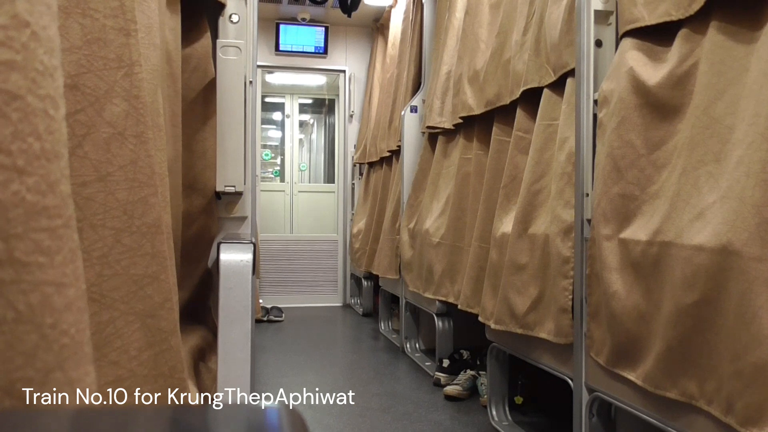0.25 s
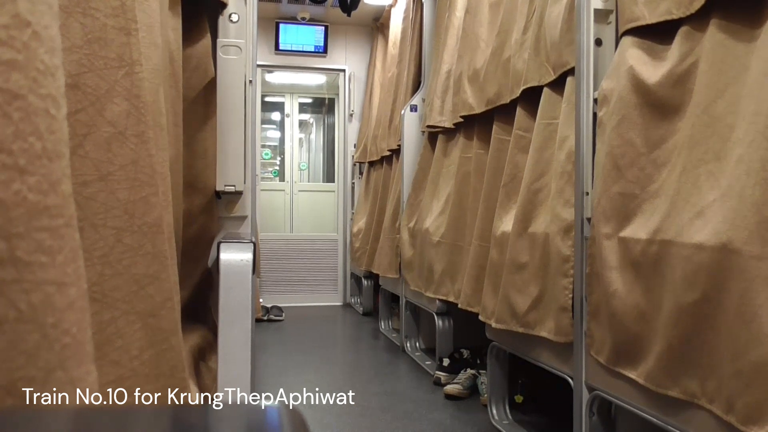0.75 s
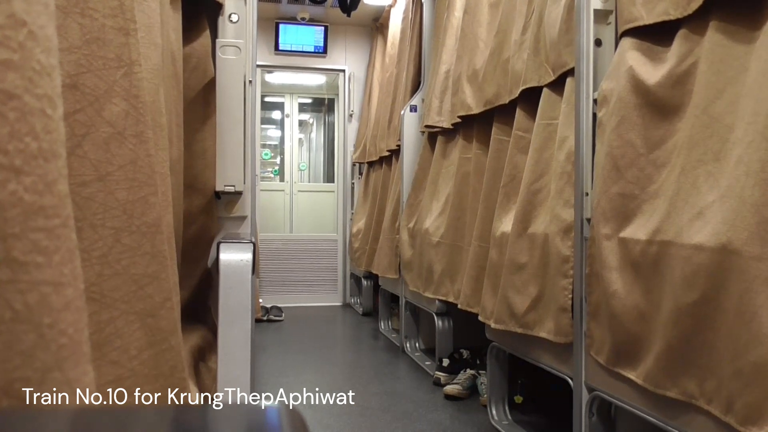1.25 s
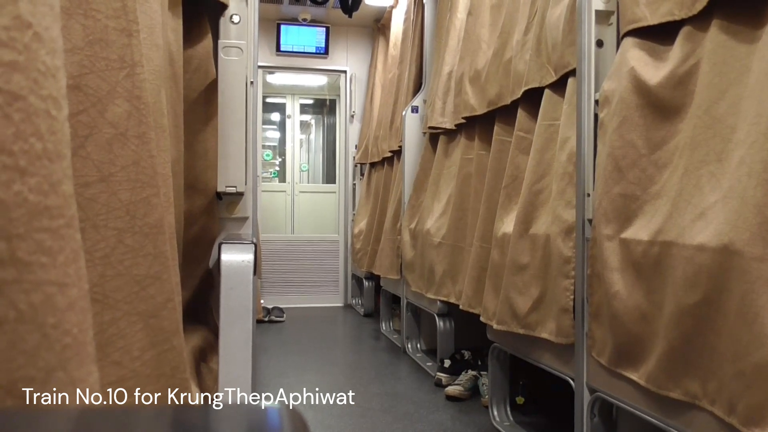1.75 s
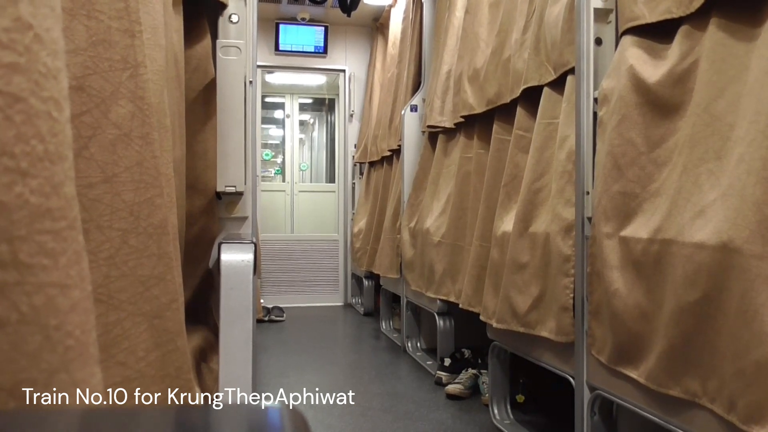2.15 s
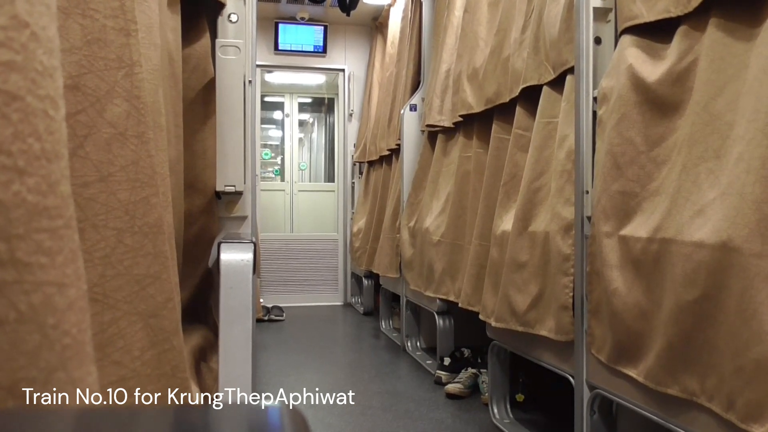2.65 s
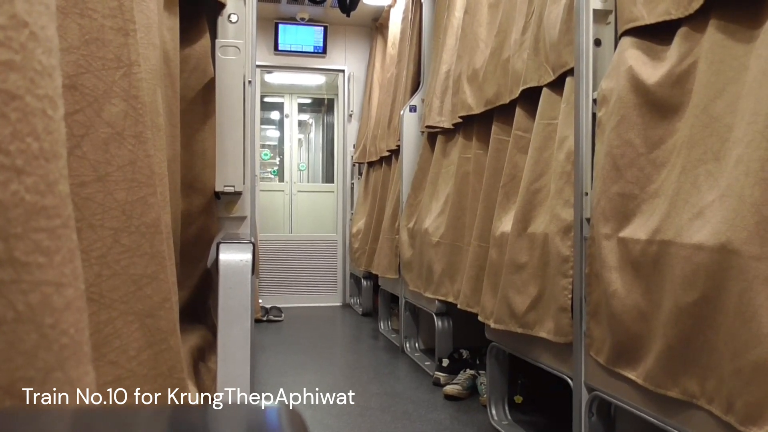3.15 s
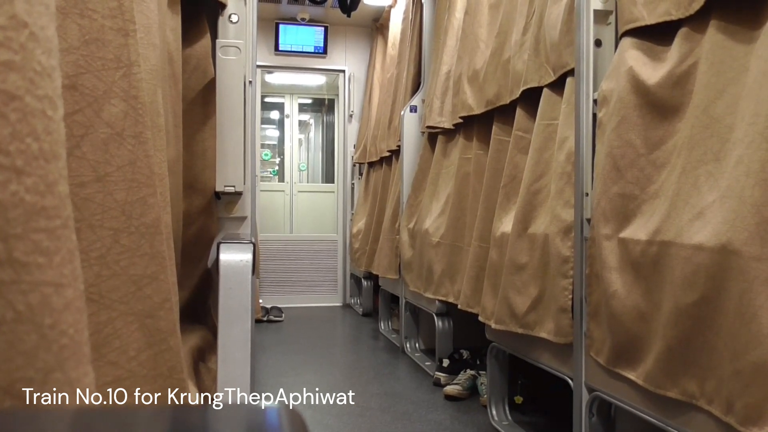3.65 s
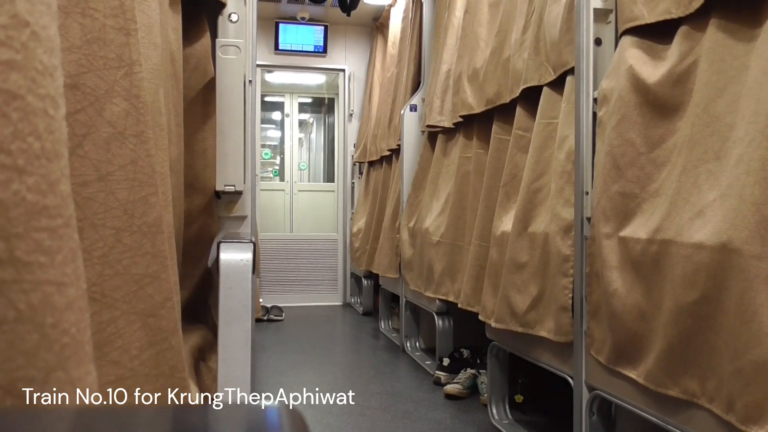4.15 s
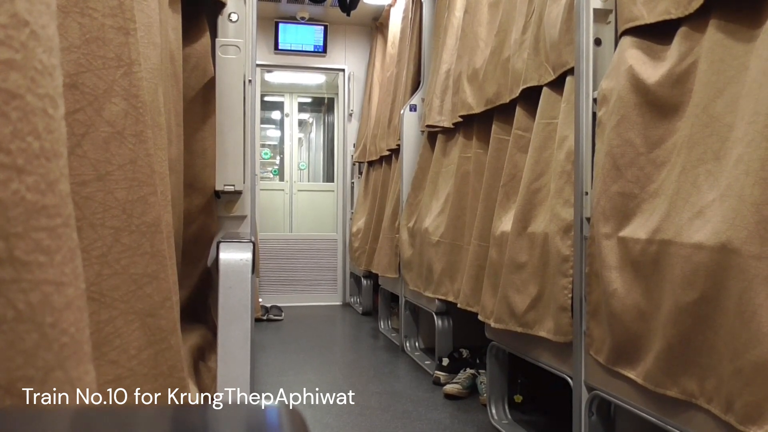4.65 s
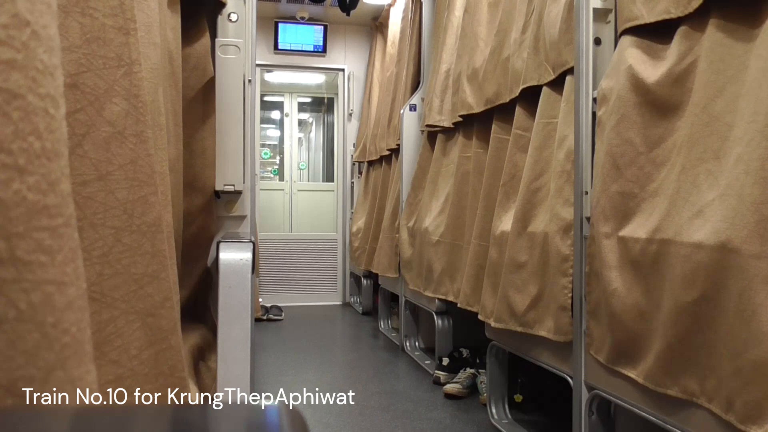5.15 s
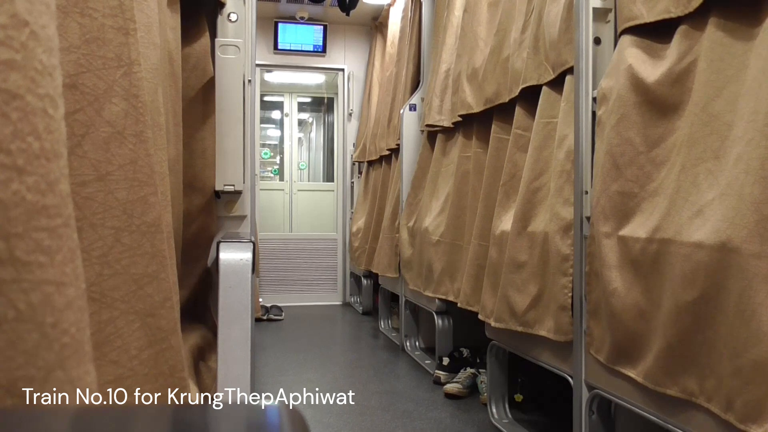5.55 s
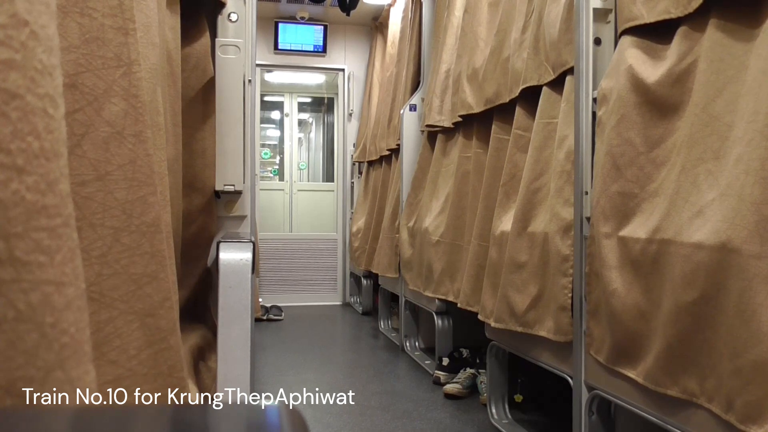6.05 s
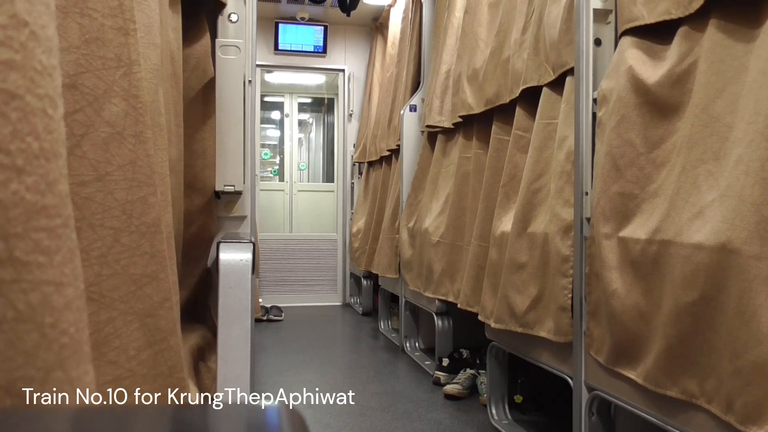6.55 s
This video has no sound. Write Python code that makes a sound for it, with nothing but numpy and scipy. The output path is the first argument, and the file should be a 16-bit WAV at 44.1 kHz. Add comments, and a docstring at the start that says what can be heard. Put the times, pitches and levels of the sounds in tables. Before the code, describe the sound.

A moving train heard from inside, among heavy curtains that deaden the echo. Muffled low-frequency running noise lurches and swells over faint ventilation. A joint chirps, a loose fitting chatters, and rough rails bring a harsh rattling roar early on. Then a loud wavering squeal rises and falls, floor jolts thump and panels knock. The ride settles, later gaining small squeaks, dry rubbing and irregular ticks. Stereo microphone at rest within the carriage.

```python
"""Rumble and roar open inside the curtained sleeper carriage of a moving night train, a joint squeaking over them.
Running noise is coloured random vibration: it swells with each lurch, and roars and crunches over rough track.
The joint squeaks by stick-slip, as gliding tones filtered by its modes; a small loose fitting ticks by modal ringing.
Jolts thump through the floor, trim creaks and panels knock as decaying bursts of modes.
Machinery hums on two wavering sines; ventilation hisses as shaped noise with faint fan whistles."""
import sys
import numpy as np
from scipy import signal
from scipy.fft import rfft, irfft
from scipy.io import wavfile
from scipy.ndimage import uniform_filter1d

SR = 44100
rng = np.random.default_rng(int(sys.argv[2]) if len(sys.argv) > 2 else 0)


def inscribe(sig):
    """Save sig as 16-bit PCM at rate SR to the path in sys.argv[1].

    A 1-D sig is mono; a 2-D sig holds one channel per row.
    Samples are clipped to [-1, 1] before scaling.
    """
    pcm = np.round(np.clip(np.atleast_2d(sig).T, -1, 1) * 32767)
    wavfile.write(sys.argv[1], SR, pcm.astype(np.int16))


N = 299880
TIME = np.arange(N) / SR
BINS = np.maximum(np.fft.rfftfreq(N, 1 / SR), 1)   # Hz

# Every spectrum gives relative density only: cabin_noise sets its strength to 1.
# cabin field, likeness of left and right: pitch_hz, likeness (-1 to 1)
LIKENESS = [(40, .85), (80, .8), (160, .78), (300, .79), (520, .59), (1100, .76), (2100, .48), (4000, .56),
            (8000, .45), (14000, .58)]
# cabin field, left minus right: pitch_hz, difference_db
LEAN = [(50, 11.5), (78, 4), (110, 0), (155, -1), (210, 10), (260, -12), (310, -5.5), (380, -2.5),
        (520, -3), (1000, -5.5), (1800, -1.5), (4200, 0), (8000, 3.5), (14000, 0)]
# broad modes of the carriage body: pitch_hz, width_hz, lift_db
BODY_MODES = [(166, 10, -4), (296.8, 18, 1.5), (350.5, 23, 3.5), (528, 28, 3.5), (769, 29, 5.5)]
# lurches, before each noise takes its share: start_s, rise_s, fall_s, lift_db
LURCHES = [(-.1, 0.14, 0.093, 5), (.47, 0.097, 0.63, 8.5), (1.002, 0.3, 1.34, 6), (2.29, .13, 0.13, 5.5),
           (2.52, 0.3, 1.1, 6.5), (4.06, 0.071, 0.1, 8), (4.73, 0.088, 0.31, 6), (5.44, 0.11, 0.33, 4),
           (5.95, 0.36, 1.1, 2)]
# track roughness, before each noise takes its share: time_s, lift_db
ROUGH_TRACK = [(0, 1.5), (.95, -1.5), (1.25, 6.5), (1.33, 8), (1.45, 12), (1.6, 13), (1.71, 12.5),
               (1.8, 10), (1.9, 12.5), (2.0, 13.5), (2.11, 14), (2.2, 9.5), (2.28, 2), (2.45, 2), (2.6, -5),
               (2.9, 2.5), (3.2, 1), (3.6, -0.5), (4.6, 0), (5.1, 0.5), (5.3, -0.5), (5.55, 1.5),
               (6.15, 1.5), (6.5, -0.5), (6.8, 0.5)]
# suspension boom, relative level: time_s, level_db
BOOM_LEVEL = [(0, -31.5), (.42, -41.5), (.75, -32.5), (.9, -38), (1.48, -34), (1.75, -45), (2.55, -40.5),
              (3.0, -30.5), (3.95, -39.5), (4.17, -32.5), (4.7, -38.5), (5.25, -38), (5.55, -33),
              (5.92, -41), (6.3, -34), (6.8, -37.5)]
# spectra of boom, cabin drone, rumble, roar and grinding: pitch_hz, density_db_per_hz
BOOM_SPECTRUM = [(18, -29.5), (30, -25), (40, -7), (52, -3), (63, -5.5), (78, -1), (95, -2.5), (130, -0.5),
                 (200, -47.5)]
DRONE_SPECTRUM = [(80, -26), (100, -26.5), (117, -4.5), (132, -15.5), (150, 1), (178, 5), (200, -7.5),
                  (230, -6.5), (300, -27.5)]
RUMBLE_SPECTRUM = [(150, -17), (200, -8), (240, -0.5), (300, 1), (370, -4.5), (425, -13), (520, -12),
                   (900, -53)]
ROAR_SPECTRUM = [(160, -32), (250, -12), (315, 1.5), (385, 8), (450, -6), (520, 4), (620, -4.5),
                 (790, -3.5), (1000, -5), (1200, -8.5), (1450, -19), (1800, -36.5), (3000, -39),
                 (6000, -50), (10500, -65.5)]
GRIND_SPECTRUM = [(240, -8), (320, 23), (400, 20.5), (470, 11.5), (540, 14), (640, 12), (1000, -18),
                  (1500, -21.5), (1800, -15), (2300, -18), (3000, -33.5), (5000, -32.5), (6500, -37),
                  (10500, -38), (12000, -62)]
# how the running noises follow the ride: level_db on smooth rail, lurch_share, rough_share
DRONE_RIDE = (-29, 1.14, 0.1)
RUMBLE_RIDE = (-27, 0.75, 0.35)
ROAR_RIDE = (-33.5, 0.071, 0.87)
# machinery hum, relative levels: pitch_hz, level_db
HUM_LINES = [(151, -33), (301, -39)]
# ventilation hiss: pitch_hz, density_db_per_hz
VENT_SPECTRUM = [(880, -13.5), (1500, -4.5), (1760, -15), (2080, -10.5), (2360, -11), (2480, -19),
                 (2820, -15.5), (2990, -22.5), (3580, -23.5), (3870, -22), (4440, -21.5), (4810, -25),
                 (7000, -26.5), (13600, -29.5), (15900, -48.5)]
# fan whistles, relative levels: pitch_hz, level_db
FAN_LINES = [(2030, -73.5), (2105, -68), (2299, -80), (2740, -76), (3590, -79), (4474, -84.5),
             (6702, -93.5)]
# long squeal before waver and joint modes: time_s, pitch_hz, level_db, roughness (0-1)
SQUEAL = [(2.402, 1045, -46, 0.27), (2.42, 1075, -20.5, 0.2), (2.439, 1083, -26.5, 0.4),
          (2.457, 1186, -13, 0.33), (2.471, 1242, -21.5, 0.62), (2.482, 1443, -19.5, .8),
          (2.494, 1505, -21, 0.7), (2.509, 1640, -20, 0.6), (2.53, 1604, -31, 0.3),
          (2.554, 1545, -30.5, 0.3), (2.577, 1659, -23, 0.4), (2.6, 1701, -32, 0.47),
          (2.622, 1680, -37, .3), (2.64, 1476, -34, .3), (2.668, 1496, -38.5, 0.15),
          (2.698, 1483, -55, 0.2), (2.719, 1502, -25.5, 0.1), (2.741, 1402, -30, .6),
          (2.755, 1311, -22, 0.73), (2.768, 1198, -24, 0.7), (2.782, 1197, -47, .7),
          (2.799, 1187, -29, 0.9), (2.817, 1215, -68, .3)]
# short squeaks before sag, waver and joint modes: start_s, length_s, start_hz, end_hz, level_db
SQUEAKS = [(-.015, 0.023, 1400, 1350, -18.5), (0.02, 0.02, 1360, 1360, -26),
           (0.082, 0.045, 1400, 1512, -29.5), (.123, 0.023, 1345, 1370, -29.5),
           (0.147, 0.026, 1410, 1360, -35), (0.175, 0.042, 1370, 1416, -34.5),
           (1.019, 0.037, 1219, 1200, -38), (1.159, 0.04, 1285, 1397, -28),
           (1.202, 0.053, 1484, 1504, -26.5), (1.267, 0.035, 1516, 1526, -30),
           (1.293, 0.047, 1565, 1534, -32.5), (1.347, 0.018, 1380, 1300, -31),
           (1.903, 0.043, 1604, 1640, -24.5), (1.933, 0.019, 1515, 1472, -19),
           (1.965, 0.014, 1500, 1530, -20.5), (4.338, 0.023, 1300, 1390, -40),
           (4.491, 0.043, 1306, 1238, -29), (4.528, 0.061, 1413, 1410, -35),
           (4.644, 0.051, 1250, 1237, -34), (5.453, 0.037, 1370, 1390, -39),
           (5.474, 0.041, 1392, 1330, -28), (5.572, 0.046, 1384, 1366, -34),
           (5.612, 0.027, 1324, 1360, -31.5), (5.632, 0.035, 1446, 1530, -30),
           (5.666, 0.12, 1370, 1357, -41), (5.813, 0.029, 1350, 1335, -25.5),
           (5.854, 0.07, 1326, 1342, -34.5), (5.91, 0.023, 1220, 1170, -35)]
# modes of the squeaking joint: pitch_hz, width_hz, level_db
JOINT_MODES = [(1178, 41, 6), (1347, 50, 4), (1467, 41, -1.5), (1565, 18, -10), (1647, 20, -14.5)]
# scraping of the slipping faces, then coarse friction around every slip: pitch_hz, density_db_per_hz
SCRAPE_SPECTRUM = [(1800, -2), (2500, -11), (3200, -7), (4000, -4), (4900, -5), (6000, -11), (10000, -10.5)]
FRICTION_SPECTRUM = [(950, 6), (1200, -2), (1500, -0.5), (1700, -10), (2000, -26)]
# thin high whistles of the joint, before flutter: start_s, length_s, level_db
WHISTLES = [(0.0, 0.019, -52), (2.46, .03, -61), (2.625, 0.065, -56), (2.703, 0.067, -59)]
# spells of rubbing without quite singing, before flutter: start_s, length_s, level_db
RUB_SPELLS = [(-.08, 0.84, -47), (1.1, 0.22, -43), (4.45, 0.44, -43), (5.4, 0.81, -37), (6.03, 0.61, -39.5)]
# colour of the joint's rubbing: pitch_hz, density_db_per_hz
JOINT_RUB_SPECTRUM = [(700, 8.5), (900, -1), (1250, -16), (1500, -16), (1750, -16), (3000, -26)]
# broad modes stirred by the rubbing: pitch_hz, width_hz, lift_db
RUB_MODES = [(873, 35, 17), (1060, 41, 23), (1197, 41, 24), (1320, 50, 5.3)]
# ticks of the loose fitting before gain and scatter, timed before contact delay: time_s, level_db
TICKS = [(0.0223, -35), (0.0638, -32), (0.1037, -34), (0.1436, -33.5), (0.1845, -37), (0.2294, -36),
         (0.2648, -33.5), (0.3092, -38), (0.3501, -36), (0.39, -35), (0.4349, -39), (0.6559, -38.5),
         (1.0949, -39.5), (1.1363, -36), (1.2146, -33), (1.2785, -43), (1.2955, -34), (1.3239, -37),
         (1.3618, -35), (1.3922, -36), (1.4566, -32), (1.7549, -35), (2.1281, -37), (2.364, -39),
         (2.4862, -41), (2.5481, -38), (2.6733, -36), (2.6938, -35), (3.2365, -44), (4.7925, -42),
         (4.9137, -37), (4.9402, -36), (4.9676, -42), (5.0095, -33), (5.0474, -39), (5.0679, -36),
         (5.1502, -40), (5.2305, -40), (5.2694, -33), (5.2949, -37), (5.3572, -42), (5.3732, -37),
         (5.4745, -45), (5.4939, -39), (5.5164, -40), (5.5533, -38), (5.5722, -37), (5.6116, -40),
         (5.6316, -37), (5.654, -34), (5.7074, -38), (5.7818, -35), (5.8446, -40), (5.8661, -43),
         (5.9244, -40), (5.9449, -41), (5.9843, -34.5), (6.0222, -40), (6.0921, -37), (6.2068, -34),
         (6.2831, -38), (6.4168, -41), (6.4747, -42), (6.5086, -42), (6.5645, -32), (6.5904, -35),
         (6.6672, -34), (6.7087, -38)]
# modes of the fitting: pitch_hz, level_db, t60_s
FITTING_MODES = [(4900, -4.5, 0.0013), (5600, -1.5, 0.0033), (5860, -14.5, 0.0018), (7100, -15, 0.0016),
                 (7710, -11, 0.0049), (8660, -2, 0.0018), (10800, 2, 0.0018), (13300, -12, .002),
                 (15400, -12.5, .003)]
# rubbing of the fitting in its seat: pitch_hz, density_db_per_hz
SEAT_RUB_SPECTRUM = [(4000, 6), (5300, -6.5), (7000, -11), (11000, 3), (15500, -9)]
# jolts through the floor, relative strength: time_s, level_db
JOLTS = [(0.149, -16), (.53, -16), (.783, -21), (.9, -18), (0.966, -16), (1.171, -19), (1.35, -27),
         (1.421, -22), (1.523, -14), (1.596, -20), (1.696, -7.5), (1.848, -14), (2.113, -6), (2.41, -26),
         (2.85, -10), (2.967, -9.5), (3.128, -31), (3.47, -23), (3.684, -26), (4.106, -9), (4.196, -14.5),
         (4.333, -20), (4.78, -16), (4.829, -16), (4.923, -16.5), (5.51, -10), (5.636, -9), (6.345, -13.5),
         (6.546, -14.5)]
# strongest modes of the floor: pitch_hz, level_db, t60_s
FLOOR_MODES = [(122, -7, 0.078), (177, 0, 0.086), (260, 2, 0.095), (296.4, 1.5, 0.11), (376, -8, 0.24)]
# crowd of floor modes: pitch_hz, density_db_per_hz
JOLT_SPECTRUM = [(60, -37), (120, -7.5), (170, 1), (320, 6.5), (450, -6), (700, -11), (1500, -70.5)]
# dry creaks of the trim: time_s, level_db
CREAKS = [(.198, -43.5), (.65, -51), (3.238, -42)]
# colour of a creak: pitch_hz, density_db_per_hz
CREAK_SPECTRUM = [(800, -7), (1600, 8.5), (3000, -3), (4400, -2.5), (6500, -13), (9000, -14), (14000, -26)]
# panel knocks: time_s, level_db
KNOCKS = [(.534, -36), (.628, -37.5), (1.022, -26.5), (1.125, -28), (2.389, -40), (2.8505, -18),
          (2.944, -23.5), (3.005, -31), (3.39, -24.5), (3.478, -30), (3.683, -31), (4.825, -34),
          (5.065, -30), (5.145, -32.5), (5.23, -37), (6.095, -27.5), (6.13, -27), (6.539, -23),
          (6.562, -40)]
# colour of a knock: pitch_hz, density_db_per_hz
KNOCK_SPECTRUM = [(250, -17.5), (520, 4.5), (900, 6), (1200, -3.5), (1500, -17.5), (2000, -27),
                  (4000, -36.5), (10000, -56.5)]
# ringing of the panels: pitch_hz, width_hz, lift_db
PANEL_MODES = [(534, 72, 7), (922, 46, 10), (1200, 65, 11.5)]
# wheels crunching over the worst spots: time_s, level_db
CRUNCHES = [(1.372, -14), (1.495, -26), (1.572, -16), (1.712, -20), (1.968, -18.5), (2.075, -21)]
# colour of a crunch: pitch_hz, density_db_per_hz
CRUNCH_SPECTRUM = [(300, -8), (550, 9.5), (850, 4.5), (1300, -1), (1700, -16), (2300, -20.5), (3200, -30),
                   (6000, -39), (11000, -53)]


def from_db(db):
    """Logarithmic level: decibels to amplitude gain."""
    return 10 ** (np.asarray(db) / 20)


def rms_one(x):
    """Normalisation: scale to rms 1."""
    return x / np.sqrt(np.mean(x ** 2) + 1e-20)


def level(rows):
    """Interpolation in decibels: gain over time from (time_s, level_db) rows."""
    return from_db(np.interp(TIME, *np.transpose(rows)))


def over_hz(points):
    """Interpolation on a log-frequency axis: join (pitch_hz, value) points."""
    hz, value = np.transpose(points)
    return np.interp(np.log(BINS), np.log(hz), value)


def drift(rate_hz):
    """Low-passed random process: slow chance with rms 1."""
    return rms_one(irfft(rfft(rng.standard_normal(N)) / (1 + (BINS / rate_hz) ** 2), N))


def cabin_noise(spectrum, modes=()):
    """Diffuse field: partly correlated stereo noise of a given colour, its middle scaled to spread 1."""
    mid, side = rfft(rng.standard_normal((2, N)))
    alike = np.clip(over_hz(LIKENESS), -.99, .99)
    pair = np.sqrt(1 + alike) * mid + np.sqrt(1 - alike) * side * [[1], [-1]]
    colour_db = over_hz(spectrum)
    for hz, width, lift_db in modes:
        colour_db = colour_db + lift_db / (1 + (2 * (BINS - hz) / width) ** 2)
    # beyond both ends the spectrum falls 12 dB an octave
    lowest, highest = spectrum[0][0], spectrum[-1][0]
    skirts = np.minimum(1, np.minimum(BINS / lowest, highest / BINS)) ** 2
    lean_db = over_hz(LEAN) * [[.5], [-.5]]
    pair = irfft(pair * skirts * from_db(colour_db + lean_db), N)
    return pair / np.std(pair.mean(axis=0))


def steady(x, window_s):
    """Power levelling: even out the slow chance swells of a noise."""
    power = uniform_filter1d(np.mean(x, axis=0) ** 2, max(int(window_s * SR), 2))
    return x / np.sqrt(power + 1e-9)


def resonate(x, hz, width_hz):
    """Forced resonance: a two-pole filter with gain 1 at its peak."""
    r = np.exp(-np.pi * width_hz / SR)
    feedforward = np.array([1, 0, -1]) * (1 - r * r) / 2
    feedback = [1, -2 * r * np.cos(2 * np.pi * hz / SR), r * r]
    return signal.lfilter(feedforward, feedback, x + 1e-18)


def ring(clicks, hz, t60):
    """Free decay: a unit click sets a sine of initial height 1 ringing."""
    r, w = np.exp(-np.log(1000) / (t60 * SR)), 2 * np.pi * hz / SR
    return signal.lfilter([0, np.sin(w)], [1, -2 * r * np.cos(w), r * r], clicks + 1e-18)


def cabin(x, t60, wet_db, pan_db):
    """Reverberation: direct sound plus dense reflections that the curtains soon swallow."""
    t = TIME[:SR // 3]
    tail = rng.standard_normal((2, len(t))) * np.exp(-np.log(1000) * t / t60)
    tail /= np.sqrt(np.sum(tail ** 2, axis=1)[:, None])
    echoes = signal.fftconvolve(x[None], tail, axes=1)[:, :N]
    balance = from_db(pan_db * np.array([[.5], [-.5]]))
    return (x + from_db(wet_db) * echoes) * balance


def swells(rows):
    """Half-sine envelope: gain of (start_s, length_s, level_db) spells that swell and fade."""
    return sum(from_db(db) * np.sin(np.pi * np.clip((TIME - s) / length, 0, 1)) for s, length, db in rows)


def blows(rows, spectrum, rise_s, t60, modes=()):
    """Modal overlap: each blow sets a crowd of close modes ringing, which die away together."""
    envelope = np.zeros(N)
    for s, db in rows:
        start = int(s * SR)
        age = TIME[:N - start][:SR // 2]
        decay = np.exp(-np.log(1000) * age / t60)
        envelope[start:start + len(age)] += from_db(db) * (1 - np.exp(-age / rise_s)) * decay
    return envelope * steady(cabin_noise(spectrum, modes), window_s=0.0099)


def ride(smooth_db, lurch_share, rough_share):
    """Variable excitation: lurches and rough track lift a gain above its level on smooth rail."""
    lurch_db = sum(np.interp(TIME, [s, s + rise, s + rise + fall], [0, lift_db, 0])
                   for s, rise, fall, lift_db in LURCHES)
    return from_db(smooth_db + lurch_share * lurch_db) * level(ROUGH_TRACK) ** rough_share


def suspension_boom(gain_db):
    """Low-frequency forced vibration: the suspension booms."""
    return from_db(gain_db) * level(BOOM_LEVEL) * steady(cabin_noise(BOOM_SPECTRUM), window_s=0.29)


def cabin_drone():
    """Air resonance: the cabin air drones, coloured by the body modes."""
    return ride(*DRONE_RIDE) * steady(cabin_noise(DRONE_SPECTRUM, BODY_MODES), window_s=0.18)


def panel_rumble(shake_db):
    """Structure-borne sound: the wheels make the panels rumble with an uneven shake."""
    rumble = steady(cabin_noise(RUMBLE_SPECTRUM, BODY_MODES), window_s=0.072)
    return from_db(shake_db * drift(8.2)) * ride(*RUMBLE_RIDE) * rumble


def rail_roar(grind_db, rattle_db):
    """Roughness excitation: the rail's roar leaks in with a rattle, and grinds on rough track."""
    gain = ride(*ROAR_RIDE)
    roar = gain * steady(cabin_noise(ROAR_SPECTRUM, BODY_MODES), window_s=0.039)
    # squared gain: bright grinding grows faster than the roar, so it stands out on rough track
    grind = from_db(grind_db) * gain ** 2 * cabin_noise(GRIND_SPECTRUM)
    return from_db(rattle_db * drift(6.5)) * (roar + grind)


def hum(waver, flutter_db):
    """Periodic forcing: machinery under the floor hums on two wavering lines that swell with lurches."""
    lines = np.zeros(N)
    for hz, db in HUM_LINES:
        phase = 2 * np.pi * np.cumsum(hz * (1 + waver * drift(5.3))) / SR
        lines += from_db(db + flutter_db * drift(2.3)) * np.sqrt(2) * np.sin(phase)
    return lines * ride(-2.25, lurch_share=1.0, rough_share=0)


def ventilation(hiss_db, whistle_db, width_hz):
    """Flow noise: smooth air hiss with faint fan whistles blurred by narrow-band filtering."""
    lines = np.zeros((2, N))
    for hz, db in FAN_LINES:
        narrow = resonate(rng.standard_normal((2, N)), hz, width_hz)
        lines += from_db(db) * rms_one(resonate(narrow, hz, width_hz))
    return from_db(hiss_db) * cabin_noise(VENT_SPECTRUM) + from_db(whistle_db) * lines


def slips(squeak_roughness, squeak_overtone_db, sag):
    """Stick-slip cycles: (samples, pitch, gain, roughness, overtone gain) of the squeal and each squeak."""
    times, *columns = np.transpose(SQUEAL)
    at = np.flatnonzero((TIME >= times[0]) & (TIME < times[-1]))
    hz, db, rough = (np.interp(TIME[at], times, column) for column in columns)
    out = [(at, hz, from_db(db), rough, 1)]
    for s, length, start_hz, end_hz, db in SQUEAKS:
        at = np.arange(max(int(s * SR), 0), min(int((s + length) * SR), N))
        along = (TIME[at] - s) / length
        swell = np.sin(np.pi * along)
        # the pitch sags by this share at the two ends
        hz = (start_hz + (end_hz - start_hz) * along) * (1 - sag * (1 - swell))
        out.append((at, hz, from_db(db) * swell, squeak_roughness, from_db(squeak_overtone_db)))
    return out


def squeaks(waver, rough_db, second_db, third_db, direct_db, bright_hz, rasp, scrape_db):
    """Stick-slip friction: gliding chirps swell where they cross the joint's modes; rough slips stutter."""
    out, wobble, grip_db = np.zeros(N), waver * drift(97), rough_db * drift(100)
    uneven = rasp * drift(450)   # radians: no two slips last equally long
    scrape = from_db(scrape_db) * cabin_noise(SCRAPE_SPECTRUM).mean(axis=0)
    friction = from_db(-5.5) * cabin_noise(FRICTION_SPECTRUM).mean(axis=0)
    flutter = from_db(4.0 * drift(200))   # of the overtones
    for at, hz, gain, rough, overtone_gain in slips(squeak_roughness=.62, squeak_overtone_db=0.5, sag=0.052):
        pitch = hz * (1 + rough * wobble[at])
        phase = 2 * np.pi * np.cumsum(pitch) / SR + rough * uneven[at]
        overtones = from_db(second_db) * np.sin(2 * phase) + from_db(third_db) * np.sin(3 * phase)
        edges = flutter[at] * overtones + scrape[at]
        # faster slips are higher and have sharper edges
        sharpness = overtone_gain * (pitch / bright_hz) ** 3
        out[at] += gain * from_db(rough * grip_db[at]) * (np.sin(phase) + sharpness * edges)
        out[at] += gain * np.sqrt(np.abs(rough)) * friction[at]
    body = sum(from_db(db) * resonate(out, hz, width) for hz, width, db in JOINT_MODES)
    return cabin(from_db(direct_db) * out + body, t60=0.11, wet_db=-5.5, pan_db=-1.5)


def whistles(pitch_hz, waver):
    """Friction-driven mode: under light pressure the joint sings in one high mode instead."""
    tone = np.sin(2 * np.pi * np.cumsum(pitch_hz * (1 + waver * drift(100))) / SR)
    return cabin(swells(WHISTLES) * from_db(3 * drift(40)) * tone, t60=0.17, wet_db=-2.5, pan_db=0)


def rubbing(catch_db):
    """Random friction: the joint's faces catch and drag, stirring its modes."""
    return swells(RUB_SPELLS) * from_db(catch_db * drift(25)) * cabin_noise(JOINT_RUB_SPECTRUM, RUB_MODES)


def ticks(gain_db, contact_s, lowest_hz):
    """Impact excitation: a light fitting chatters; each touch strikes its modes with new strengths."""
    times, tick_db = np.transpose(TICKS)
    at = np.clip(((times + contact_s) * SR).astype(int), 0, N - 1)
    out = np.zeros(N)
    scatter_db = 3.6 * rng.standard_normal((len(at), len(FITTING_MODES)))
    for k, (hz, db, t60) in enumerate(FITTING_MODES):
        clicks = np.zeros(N)
        clicks[at] = from_db(tick_db + db + gain_db + scatter_db[:, k])
        out += ring(clicks, hz, t60)
    # so small a part radiates no lows
    out = signal.sosfilt(signal.butter(4, lowest_hz, "high", fs=SR, output="sos"), out)
    # it also rubs faintly in its seat for as long as it is shaken
    power = signal.fftconvolve(out ** 2, signal.get_window("hann", SR // 12), "same") / (SR // 24)
    shaken = np.sqrt(np.maximum(power, 0))
    seat_rub = from_db(-7.0) * shaken * cabin_noise(SEAT_RUB_SPECTRUM)
    return cabin(out, t60=0.014, wet_db=1.0, pan_db=2.5) + seat_rub


def thumps(gain_db, contact_s):
    """Impulse response: one firm push per jolt sets the floor's modes ringing, each with a new strength."""
    times, db = np.transpose(JOLTS)
    scatter_db = 1.5 * rng.standard_normal((len(times), len(FLOOR_MODES)))
    push = signal.get_window("hann", max(int(contact_s * SR), 4))
    out = np.zeros(N)
    for k, (hz, mode_db, t60) in enumerate(FLOOR_MODES):
        clicks = np.zeros(N)
        clicks[(times * SR).astype(int)] = from_db(db + mode_db + gain_db + scatter_db[:, k])
        out += (-1) ** k * ring(clicks, hz, t60)   # neighbouring modes alternate in sign
    return cabin(signal.lfilter(push / push.sum(), 1, out), t60=0.05, wet_db=-5.5, pan_db=0.0)


def jolts():
    """Modal superposition: the floor's strongest modes ring above a crowd of weaker ones."""
    return thumps(gain_db=-6.0, contact_s=0.0026) + blows(JOLTS, JOLT_SPECTRUM, rise_s=0.0099, t60=0.15)


def creaks():
    """Sudden release: the trim creaks in dry bursts that decay."""
    return blows(CREAKS, CREAK_SPECTRUM, rise_s=0.0012, t60=0.16)


def knocks():
    """Plate vibration: each knock rings the broad modes of the panels."""
    return blows(KNOCKS, KNOCK_SPECTRUM, rise_s=0.0018, t60=0.17, modes=PANEL_MODES)


def crunches():
    """Rolling impact: the wheels crunch over the worst spots in slower, longer bursts."""
    return blows(CRUNCHES, CRUNCH_SPECTRUM, rise_s=0.012, t60=0.23)


def scene():
    """Superposition: running noise, the air supply and the carriage's own small sounds add."""
    running = suspension_boom(gain_db=2.65) + cabin_drone() + panel_rumble(shake_db=1.7)
    running = running + rail_roar(grind_db=26.5, rattle_db=1.07) + hum(waver=0.01104, flutter_db=3.5)
    air = ventilation(hiss_db=-54, whistle_db=6.0, width_hz=38)
    joint = squeaks(waver=0.0297, rough_db=3.5, second_db=-17, third_db=-24.0, direct_db=-14.0,
                    bright_hz=1530, rasp=0.1, scrape_db=-22.0)
    joint = joint + whistles(pitch_hz=3596, waver=0.0051) + rubbing(catch_db=4.0)
    fitting = ticks(gain_db=-6.0, contact_s=0.0012, lowest_hz=4270)
    return running + air + joint + fitting + jolts() + creaks() + knocks() + crunches()


def record(dry):
    """Saturation and band-limiting: the loudest peaks are rounded off and the top is cut steeply."""
    rounded = dry / (1 + np.abs(dry) ** 6) ** (1 / 6)
    low_pass = signal.ellip(10, .1, 90, 15900, fs=SR, output="sos")   # cutoff in Hz
    return signal.sosfilt(low_pass, rounded)


dry = scene()
out = record(dry)
inscribe(out)
```